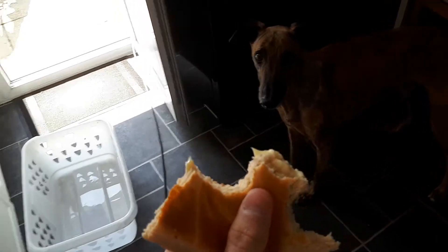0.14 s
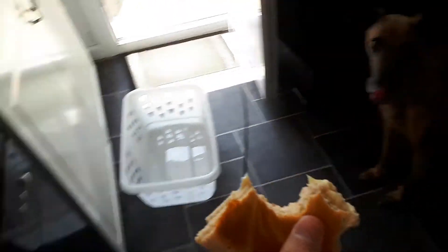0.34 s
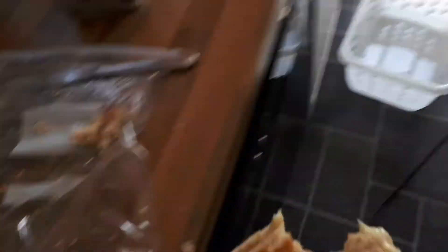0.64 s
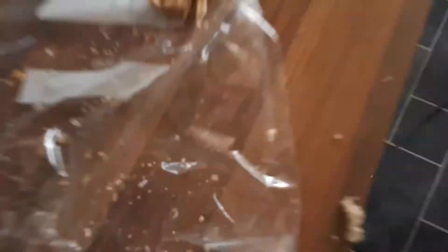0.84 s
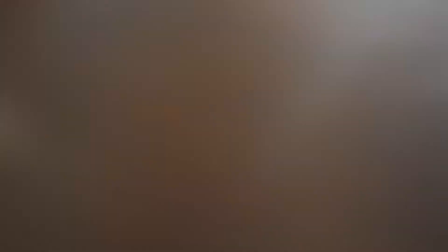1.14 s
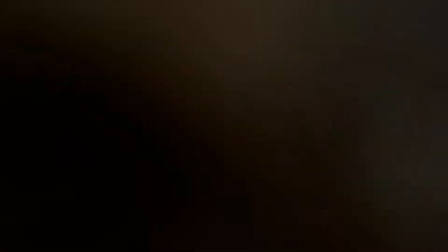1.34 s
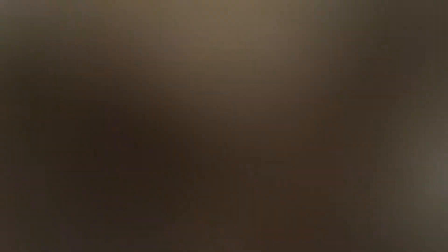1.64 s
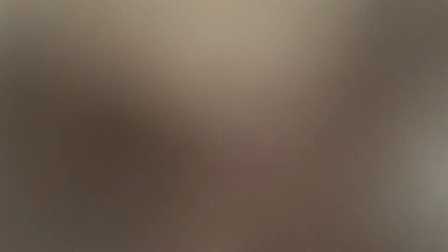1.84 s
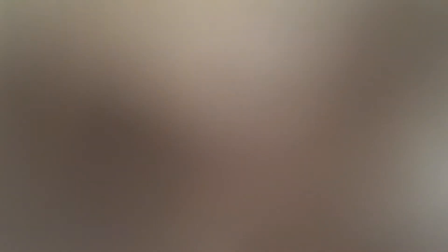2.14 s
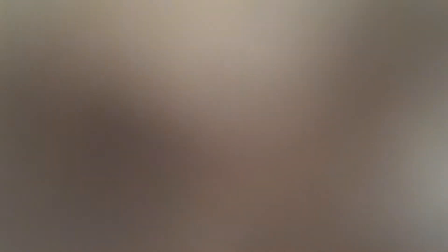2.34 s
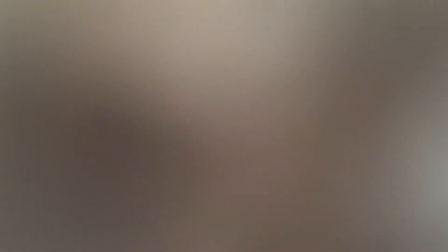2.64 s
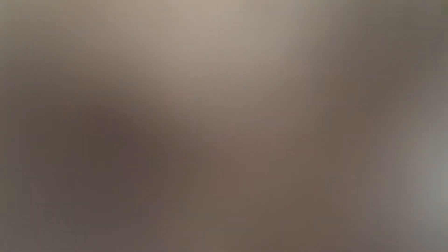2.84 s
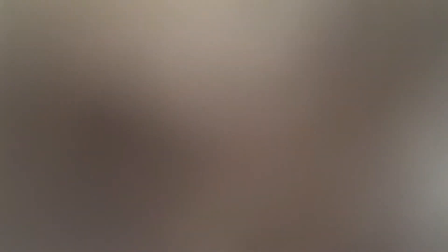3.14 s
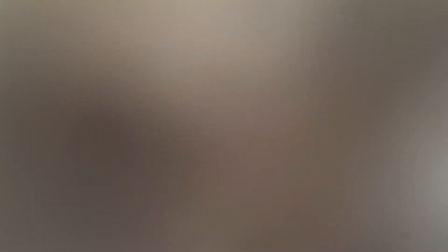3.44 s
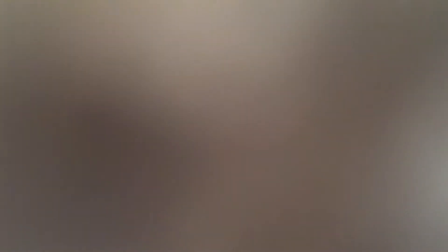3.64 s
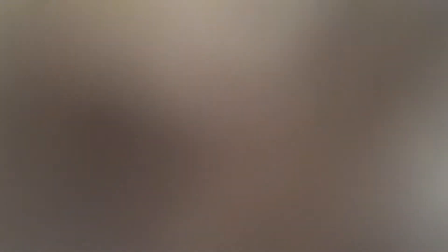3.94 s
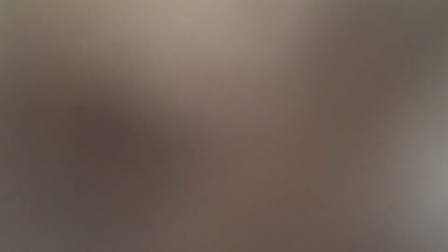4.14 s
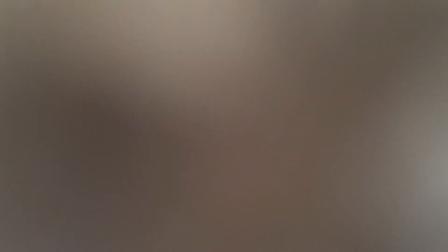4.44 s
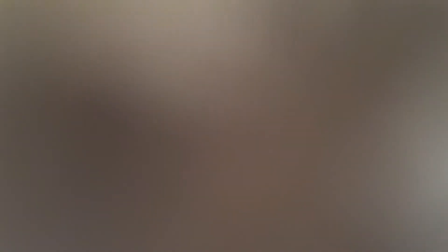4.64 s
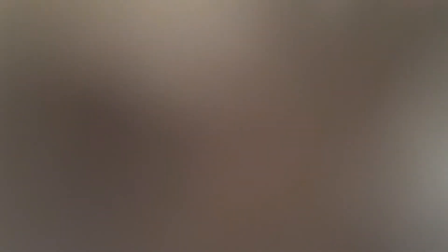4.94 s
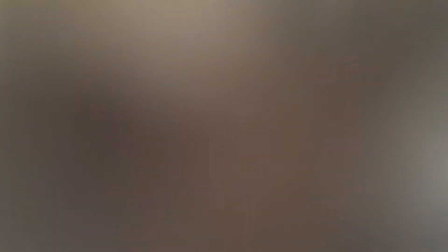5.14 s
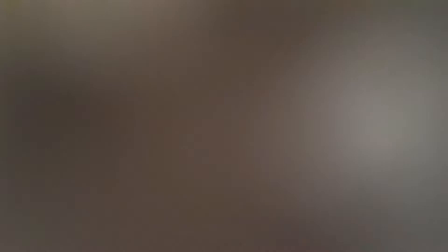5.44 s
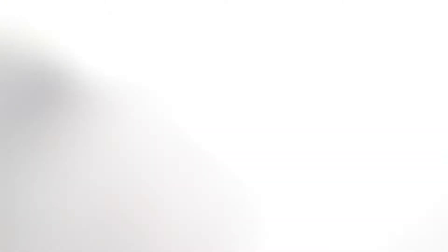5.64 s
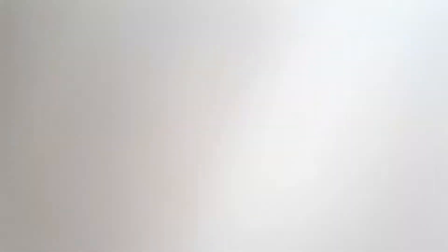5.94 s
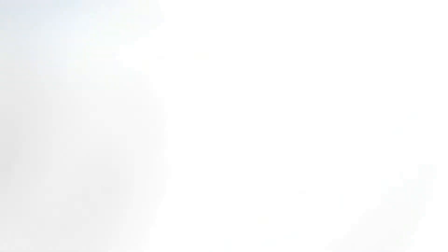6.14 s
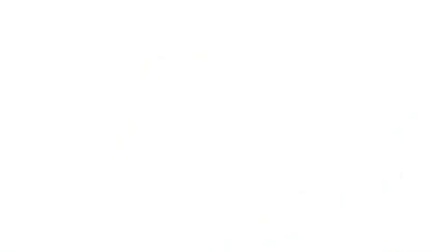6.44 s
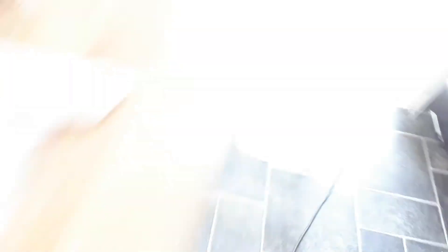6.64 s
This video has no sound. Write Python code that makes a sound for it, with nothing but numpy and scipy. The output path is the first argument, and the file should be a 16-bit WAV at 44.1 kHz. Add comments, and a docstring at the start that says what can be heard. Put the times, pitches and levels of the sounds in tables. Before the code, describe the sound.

Very close stereo handling noise in a calm kitchen. After a second of low hum, hiss and faint wavering whistle, plastic film and dry crust snap loudly against the phone with dull hollow knocks, leaning left. A couple of quiet seconds hold only little taps. Then comes a shorter, left-sided crunch and rumble, a pause with a breezy puff, and uneven crackling bumps before the hush.

```python
"""A quiet kitchen with an open door hums and hisses, with faint rustles, small taps and a thin whistle.
Then a phone is laid face down on a crumb-strewn plastic bread bag, shifted while a crusty roll is torn,
and picked up. Bag and crust crackle right at its two microphone ports; the case thuds and rumbles, mostly left.
Room, rustles and puffs are shaped noise, taps dying noise, the whistle a fluttering tone; snaps are short bursts,
thuds rung noise, and shoves drive random slips through case and crease resonances."""
import sys
import numpy as np
from scipy import signal
from scipy.fft import rfft, irfft, next_fast_len
from scipy.io import wavfile

SR = 44100
rng = np.random.default_rng(int(sys.argv[2]) if len(sys.argv) > 2 else 0)


def log_audio(samples):
    """Write samples as a 16-bit WAV file to the path given in sys.argv[1]."""
    # one column per channel
    frames = np.atleast_2d(samples).T
    # limit to full scale, then quantise
    limited = np.clip(frames, -1, 1)
    pcm = np.round(limited * 32767).astype(np.int16)
    wavfile.write(sys.argv[1], SR, pcm)


N = 298939
SILENT_DB = -120


def from_db(db):
    """Turns dB into an amplitude factor."""
    return 10 ** (np.asarray(db) / 20)


def rms_one(x):
    """Scales the whole signal, both ports together, to rms 1."""
    return x / np.sqrt(np.mean(x ** 2) + 1e-20)


def in_time(tables, level_columns):
    """Joins tables into curves over time; level columns fall silent outside each table."""
    rows = []
    for table in tables:
        first, last = np.array(table[0], float), np.array(table[-1], float)
        first[0] -= .01   # 10 ms fade at either end
        last[0] += .01
        first[level_columns] = last[level_columns] = SILENT_DB
        rows += [first, *table, last]
    seconds, *columns = np.transpose(rows)
    return [np.interp(np.arange(N) / SR, seconds, column) for column in columns]


def at_hz(points, hz):
    """Reads a spectrum in dB along log frequency, -80 dB beyond its ends."""
    point_hz, point_db = np.transpose(points)
    return np.interp(np.log(hz), np.log(point_hz), point_db, -80, -80)


def drift(rate_hz):
    """Slow random wander from twice-smoothed noise, one strand a port, spread 1."""
    step = 40   # samples between slow points
    r = np.exp(-2 * np.pi * rate_hz * step / SR)
    noise = rng.standard_normal((2, N // step + 2002))
    slow = signal.lfilter([1], [1, -2 * r, r * r], noise)[:, 2000:]   # skip the filter settling
    return np.array([np.interp(np.arange(N) / step, np.arange(len(s)), rms_one(s)) for s in slow])


def band(x, low_hz, high_hz):
    """Keeps one frequency band."""
    edges = [low_hz, min(high_hz, .45 * SR)]
    return signal.sosfilt(signal.butter(2, edges, "band", fs=SR, output="sos"), x)


def octave_band(x, hz, octaves):
    """Keeps a band centred on hz and so many octaves wide."""
    return band(x, hz * 2 ** (-octaves / 2), hz * 2 ** (octaves / 2))


def coloured(x, spectrum, right=((1, 0), (SR, 0))):
    """Shapes both ports by a spectrum, the right with an extra colour, each levelled to spread 1."""
    size = next_fast_len(N)
    hz = np.maximum(np.arange(size // 2 + 1) * SR / size, 1)
    gain = from_db(at_hz(spectrum, hz) + np.array([0 * hz, at_hz(right, hz)]))
    out = irfft(rfft(x, size) * gain, size)[:, :N]
    return out / out.std(axis=1, keepdims=True)


def dying_noise(count, t60):
    """Noise that falls 60 dB in t60 seconds, independent at each port."""
    return rng.standard_normal((2, count)) * from_db(-60 * np.arange(count) / SR / t60)


def at_ports(db, pan_db):
    """Splits a level by its left-minus-right dB: the port powers sum to 6 dB above it."""
    return db + 6 - 10 * np.log10(1 + 10 ** (np.array([-pan_db, pan_db]) / 10))


def add(out, start_s, sound, left_right_db):
    """Lays a short sound in, each port at its own peak level."""
    place = out[:, round(start_s * SR):][:, :sound.shape[1]]
    peaks = np.abs(sound).max(axis=1, keepdims=True)
    place += from_db(left_right_db)[:, None] * sound / peaks


# Room tone. Each row: time in seconds, hum level in dB before its slow wander, air level in dB.
ROOM_LEVELS = [(0, -71.5, -75), (.65, -66.5, -73), (1.7, -71.5, -77.5), (2.4, -71.5, -76.5),
               (3, -67, -73.5), (3.6, -70, -72.5), (5, -69.5, -74), (6.5, -68, -72.5), (6.78, -66.5, -76)]
# Spectra of low hum, room air and microphone hiss. Each row: frequency in Hz, relative level in dB.
HUM_SPECTRUM = [(12, -45.5), (20, -18.5), (38, -5.5), (59, -4.5), (76, -1), (162, 0.5), (203, -17),
                (245, -11), (400, -24.5), (520, -45), (880, -120)]
AIR_SPECTRUM = [(180, -27.5), (300, -2.5), (320, -15.5), (357, -8), (906, -6.5), (1160, -11.5), (2560, -17),
                (4000, -26), (5200, -57), (8800, -120)]
HISS_SPECTRUM = [(1470, -31), (2500, -3.5), (2710, -6), (4890, -6.5), (15000, -8), (16500, -21)]
# How far the two ports hear the same room. Each row: frequency in Hz, left-right correlation from -1 to 1.
PORT_LIKENESS = [(60, 0.62), (240, 0.67), (950, 0.08), (3770, -0.3), (15000, -0.03)]


def kitchen():
    """Hum and air reach both ports alike in the bass, over the microphones' own separate hiss."""
    hum_db, air_db = in_time([ROOM_LEVELS], [])
    mid, side = rfft(rng.standard_normal((2, N)))
    alike = np.interp(np.arange(len(mid)) * SR / N, *np.transpose(PORT_LIKENESS))
    shared, opposed = np.sqrt(1 + alike) * mid, np.sqrt(1 - alike) * side
    room = irfft(np.array([shared + opposed, shared - opposed]), N)
    hum = from_db(hum_db + 2 * drift(6)[0]) * coloured(room, HUM_SPECTRUM)
    air = from_db(air_db) * coloured(room, AIR_SPECTRUM)
    hiss = from_db(-78.5) * coloured(rng.standard_normal((2, N)), HISS_SPECTRUM)
    return hum + air + hiss


# Thin whistle from afar, a table per strand.
# Each row: time in seconds, pitch in Hz before its wobble, level in dB before its breathy flutter.
WHISTLE_STRANDS = [
    [(.4, 1900, -84), (.49, 2104, -76), (.57, 2141, -66.5), (.7, 2280, -81), (.81, 2580, -70),
     (.89, 2546, -71), (.94, 2130, -66), (1.0, 2200, -74), (1.07, 2545, -61), (1.12, 2620, -65)],
    [(2.05, 2076, -83.5), (2.25, 1868, -87)],
    [(2.34, 2520, -79), (2.41, 2540, -78)],
]


def whistle():
    """A tone follows the pitch, blurred into a narrow breathy strand by random flutter in size and phase."""
    hz, db = in_time(WHISTLE_STRANDS, [2])
    breathy = .5 + .5 * (drift(70) + 1j * drift(70))
    wobbling_hz = hz * (1 + 0.015 * drift(25)[0])
    tone = np.exp(2j * np.pi * np.cumsum(wobbling_hz) / SR)
    return from_db(db) * np.real(breathy * tone)


# Small taps away from the ports, the room ringing on. Each row: start in seconds, centre in Hz,
# width in octaves, peak midway between the ports in dB, left minus right in dB, 60 dB decay in seconds.
TAP_EVENTS = [(0.289, 2160, 0.15, -55.5, -9, 0.2), (.325, 2100, 0.42, -65, -15, 0.18),
              (.352, 775, .4, -54.5, 0, 0.42), (.478, 370, 0.63, -49.5, -1, 0.17),
              (0.479, 2080, 0.34, -57.5, -5, 0.071), (.465, 4960, 0.13, -66, 4, 0.26),
              (0.29, 1430, 0.26, -61, -4, 0.17), (.78, 8600, .8, -58.5, -4, 0.34),
              (0.742, 119, 0.79, -53.5, -9, 0.037), (0.818, 134, 0.79, -57.5, -13, 0.058),
              (1.721, 3140, 1.93, -53.5, 13, 0.034), (2.05, 6990, 1.5, -66, 5.5, 0.046),
              (2.584, 1490, 1, -61, 7, 0.064), (2.829, 2230, 0.33, -66, 0.5, 0.059),
              (3.295, 8150, 1.2, -52.5, 9, 0.018), (3.327, 7380, 1.06, -48.5, 20.5, 0.011),
              (3.581, 5000, 1.5, -62.5, 13, 0.017), (3.613, 2300, 0.3, -53, 2.5, 0.14),
              (3.643, 2190, 0.45, -57.5, 6, 0.16), (3.644, 7780, 0.39, -56, 9, 0.022),
              (3.705, 1400, 1.5, -57, 8, .08), (3.685, 170, 0.84, -59, -1, .08),
              (3.821, 1200, 5.1, -49, 18, 0.024), (4.926, 3400, 2.4, -52.5, -7, 0.02),
              (5.074, 950, 0.63, -59, 1.5, 0.039), (5.084, 2550, 0.37, -54.5, 5.5, 0.13),
              (5.091, 2950, 0.12, -63.5, 2.5, 0.34), (5.156, 2200, 0.27, -66.5, 6.5, 0.061)]


def taps():
    """A sharp start in one band, dying in the room."""
    out = np.zeros((2, N))
    for start_s, hz, octaves, db, pan_db, t60 in TAP_EVENTS:
        tap = octave_band(dying_noise(count=9000, t60=t60), hz, octaves)
        add(out, start_s, tap, [db + pan_db / 2, db - pan_db / 2])
    return out


# Air pushed over the ports. Each row: time in seconds, level in dB before the lumps swell and fade.
PUFF_LEVELS = [(4.53, -70.5), (4.558, -77), (4.68, -53), (4.92, -74)]


def puff():
    """Moving air makes lumpy low noise, mostly shared by the ports."""
    low_noise = band(band(rng.standard_normal((2, N)), 25, 280), 20, 320)
    lumps = low_noise * from_db(3.0 * drift(20))
    level_db, = in_time([PUFF_LEVELS], [1])
    return from_db(level_db) * rms_one(lumps[0] + 0.53 * lumps)


# Faint rustles while nothing presses on the ports. Each row: start in seconds, length in seconds,
# centre in Hz, width in octaves, level at the top of the swell in dB before flicker.
RUSTLE_EVENTS = [(0.261, 0.26, 9100, 4.3, -70.5), (0.643, 0.25, 7400, 0.48, -72),
                 (0.636, 0.21, 12100, 0.55, -78), (0.644, 0.26, 2070, 1.15, -70),
                 (0.44, 0.13, 8470, 0.51, -75.5), (1.071, 0.15, 10000, 1.2, -62),
                 (1.737, .1, 7720, 0.52, -80.5), (3.804, 0.14, 7800, .5, -73),
                 (3.269, 0.11, 6780, 0.97, -68.5), (3.27, 0.12, 2200, 1.3, -72.5),
                 (3.597, 0.15, 7500, .25, -74), (6.449, 0.25, 2000, 1.44, -72.5)]


def rustles():
    """Short swells of band noise, quick to start, with a flickering level."""
    out, flicker = np.zeros((2, N)), from_db(2.4 * drift(19)[0])
    for start_s, length_s, hz, octaves, db in RUSTLE_EVENTS:
        count = round(length_s * SR)
        swell = np.sin(np.pi * np.linspace(0, 1, count) ** 0.56)   # peaks before the middle
        noise = octave_band(rng.standard_normal((2, 12000))[:, :count], hz, octaves)
        out[:, round(start_s * SR):][:, :count] += from_db(db) * swell * rms_one(noise)
    return flicker * out


# Thuds on the case. Each row: start in seconds, level in dB shared out by at_ports,
# left minus right in dB, ring in Hz, 60 dB ring decay in seconds.
THUD_EVENTS = [(1.033, -42.5, -13, 302, 0.02), (1.12, -22.5, 26, 230, 0.038), (1.163, -12, 27, 178, 0.021),
               (1.211, -13.5, 18, 219, 0.02), (1.25, -8, 24, 372, 0.026), (1.293, -19, 14.5, 390, 0.017),
               (1.328, -30.5, 5.0, 480, 0.025), (1.391, -24.5, 23, 365, 0.025), (1.408, -21, 6, 336, 0.022),
               (1.434, -23, 12, 170, 0.036), (1.487, -34, -8, 298, 0.02), (1.575, -30.5, 37, 280, 0.025),
               (3.764, -23.5, 42, 420, 0.025), (3.966, -17, 28.0, 182, 0.025), (4.041, -19, 36, 404, 0.048),
               (4.064, -10.5, 39, 367, 0.018), (4.14, -27.5, 39, 336, 0.041), (4.19, -14.5, 36, 334, 0.039),
               (4.208, -13, 46, 436, 0.058), (4.288, -25, 41.0, 414, 0.059), (4.342, -29.5, 35, 570, 0.025),
               (4.375, -32, 34, 410, 0.035), (4.418, -39, 29.0, 360, 0.031), (4.486, -32.5, 39, 448, 0.031),
               (5.226, -31, 26, 441, 0.025), (5.348, -33, 17, 467, 0.025), (5.42, -26.5, 27, 475, 0.021),
               (5.439, -23, 32, 380, 0.017), (5.55, -14.5, 19, 307, 0.025), (5.591, -20, 26, 364, 0.01),
               (5.647, -11.5, 33, 456, 0.012), (5.723, -21, 31, 292, 0.015), (5.774, -36, 26, 463, 0.019),
               (5.832, -30, 34, 345, 0.022), (5.865, -27.5, 35, 367, 0.057), (5.924, -22, 27.5, 297, 0.036),
               (5.953, -14, 38, 377, 0.0083), (5.992, -33.5, -6, 340, 0.019), (6.008, -35, 16, 354, 0.0088),
               (6.065, -17.5, 32.0, 160, 0.0083), (6.111, -24.5, 18, 288, 0.043),
               (6.147, -26.5, 16, 223, 0.021), (6.188, -23.5, 20, 186, 0.031),
               (6.221, -20.5, 11, 290, 0.016)]


def thuds():
    """A short rough push rings the hollow between case and bag, a damped resonator."""
    out = np.zeros((2, N))
    for start_s, db, pan_db, hz, t60 in THUD_EVENTS:
        r, turn = from_db(-60 / (t60 * SR)), 2 * np.pi * hz / SR   # decay and angle per sample
        push = dying_noise(count=4000, t60=0.027)
        ring = signal.lfilter([1, -1], [1, -2 * r * np.cos(turn), r * r], push)
        add(out, start_s, band(ring, 90, 2300), at_ports(db, pan_db))
    return out


# Snaps of film and crust. Each row: start in seconds, level in dB shared out by at_ports, left minus right
# in dB, treble against body in dB, body centre in Hz, 60 dB decay of the burst's middle layer in seconds.
SNAP_EVENTS = [(1.0182, -34.5, -24, -4.5, 1970, 0.0046), (1.039, -42, -25, 7, 2280, 0.0075),
               (1.1222, -20.5, 3, -17, 1530, 0.0044), (1.153, -15, 16, -1, 2520, 0.012),
               (1.1681, -19, -3, -15, 1740, 0.006), (1.1866, -8, 13, -26, 1730, 0.007),
               (1.2176, -11, 13, -4.5, 1700, 0.002), (1.2357, -8.5, 16, -2, 2600, 0.0088),
               (1.2389, -15, 11.5, -5.5, 4460, 0.0081), (1.2497, -20, 5.0, -4, 1210, 0.006),
               (1.2512, -14.5, 6, -2, 1610, 0.01), (1.27, -4, 20, 3, 2840, 0.0086),
               (1.275, -11, 20, 11, 2900, 0.006), (1.298, -10.5, 9, 5, 1630, 0.0072),
               (1.3182, -20, -5.5, -4, 2820, 0.006), (1.3292, -15, -11, 8, 1560, 0.0084),
               (1.3478, -28, 4, -6, 2300, 0.006), (1.3942, -23, 18.5, -8, 1730, 0.011),
               (1.4092, -20.5, 6.5, -4.5, 1900, 0.006), (1.417, -19, -9, 0, 1630, 0.011),
               (1.4285, -7.5, -2, 5.5, 3850, 0.0057), (1.4333, -19, 3, 11, 1310, 0.0049),
               (1.4685, -31, -6, 3, 1820, 0.006), (1.487, -12, -16, 4, 1740, 0.012),
               (1.5038, -24.5, -1.5, 2.5, 1690, 0.0053), (1.5377, -47, -5.0, 7, 2310, 0.006),
               (1.5727, -29.5, 13, -0.5, 2930, 0.0045), (1.587, -43, 0, 0, 3020, 0.006),
               (3.7658, -20.5, 32.5, -7.5, 1300, 0.006), (3.9264, -29, 10.5, -9, 3520, 0.006),
               (3.938, -22.5, 25, -7, 2470, 0.0075), (3.9648, -17, 12.0, -6, 1490, 0.012),
               (4.0177, -28.5, 13.0, 3, 1200, 0.009), (4.0371, -26.5, 19, -5, 1280, 0.0056),
               (4.0654, -19, 18.5, -18, 1190, 0.012), (4.1642, -25, 20, -13, 2040, 0.006),
               (4.1742, -16.5, 27, -5, 1260, 0.0046), (4.185, -9.5, 22, 5, 1530, 0.0073),
               (4.1964, -14, 18, -7, 4240, 0.0053), (4.2084, -35, 15, 11, 1240, 0.006),
               (4.2366, -20.5, 25, -7, 1630, 0.006), (4.2732, -33, 12, -1, 1450, 0.006),
               (4.29, -32, 24, -18, 1730, 0.0068), (4.3114, -18.5, 27, -8, 1400, 0.0083),
               (4.3782, -41.5, 13, -18, 1350, 0.0072), (4.4148, -36, 18, -23, 2230, 0.006),
               (4.4694, -41, 26, 0, 1700, 0.0044), (4.4867, -41, 21.5, 1, 1250, 0.0065),
               (4.9288, -34.5, 7, -11, 4120, 0.006), (5.226, -26, 16.5, -3.5, 1200, 0.0066),
               (5.2426, -25, 18, 2.5, 1640, 0.0047), (5.2489, -37, 7, 7, 2550, 0.005),
               (5.309, -37, -18, 1, 3980, 0.0049), (5.3307, -18, 0.5, -23, 2700, 0.0086),
               (5.3489, -21.5, 4, -20, 1740, 0.0034), (5.3976, -30.5, 8, -2, 1590, 0.0067),
               (5.428, -20.5, 14, -10, 2900, 0.006), (5.445, -17, -12, -11, 2730, 0.0054),
               (5.461, -25.5, 3, -12, 3000, 0.011), (5.5074, -27, 7.5, -12, 2480, 0.01),
               (5.5164, -25.5, 4, -9, 1610, 0.0048), (5.5501, -15, 10.0, -2, 1550, 0.011),
               (5.5626, -25, 2, 3, 1780, 0.0086), (5.6064, -26, 13, 2, 3260, 0.0075),
               (5.6457, -17, 18.0, -16, 1200, 0.011), (5.681, -29, 5, -1, 2420, 0.0072),
               (5.7194, -26, 16, -1, 3130, 0.006), (5.729, -14.5, -6, 17, 1250, 0.0048),
               (5.7757, -25, 3, -9, 2670, 0.005), (5.7972, -29, 9.0, 3, 2980, 0.0055),
               (5.8336, -36.5, 22, 5, 1240, 0.011), (5.896, -26.5, 0.0, 1, 3920, 0.006),
               (5.904, -17, 13, -19, 3440, 0.006), (5.92, -25, 14, -13, 1350, 0.005),
               (5.9534, -15.5, 4.5, -2.5, 1160, 0.011), (5.9918, -21, -8, -6.5, 1950, 0.01),
               (6.0184, -29.5, 6, 10, 1640, 0.0054), (6.0657, -17.5, 15, -16, 1460, 0.0049),
               (6.0774, -27, 4, -13, 1420, 0.007), (6.1487, -25.5, 5, -9, 1920, 0.013),
               (6.1948, -23.5, 12, -12, 4400, 0.0094), (6.22, -25.5, -6, -6, 2220, 0.0086),
               (6.2263, -18, 31, -3, 1800, 0.006), (6.3281, -29.5, 10, -6, 4160, 0.0076)]


def snaps():
    """Each snap is a sharp front, a few ms of dying noise and a weak longer tail, in a body and a treble band."""
    out = np.zeros((2, N))
    for start_s, db, pan_db, treble_db, hz, t60 in SNAP_EVENTS:
        front = from_db(5.0) * dying_noise(count=1500, t60=.0015)
        middle = dying_noise(count=1500, t60=t60)
        tail = from_db(-22.5) * dying_noise(count=1500, t60=0.015)
        burst = front + middle + tail
        body = rms_one(band(burst, hz / 2.0, hz * 1.644))
        treble = from_db(treble_db) * rms_one(band(burst, 2700, 14000))
        add(out, start_s, body + treble, at_ports(db, pan_db))
    return out


def grains(per_s, spread_db, clump_db, clump_rate_hz, smooth):
    """Friction as random slips of uneven size, arriving in clumps, over a share of smooth noise."""
    sizes = from_db(spread_db * np.minimum(rng.exponential(1, (2, N)), 4)) * rng.choice([-1, 1], (2, N))
    slips = rms_one(sizes * (rng.random((2, N)) < per_s / SR))
    clumps = from_db(clump_db * drift(clump_rate_hz))
    smooth_noise = smooth * rng.standard_normal((2, N))
    return clumps * slips + np.sqrt(clumps) * smooth_noise   # the smooth part swells less


def creases(slips):
    """Each slip lands on a crease with its own pitch, which rings down 60 dB in nine cycles."""
    pitches_hz = np.geomspace(800, 14000, 12)
    # a fresh crease is dealt every 64 samples
    dealt = rng.integers(0, 12, (2, N // 64 + 1)).repeat(64, axis=1)[:, :N]
    out = .5 * slips
    for k, hz in enumerate(pitches_hz):
        r, turn = from_db(-60 * hz / (9.0 * SR)), 2 * np.pi * hz / SR
        struck = slips * (dealt == k) + 1e-18   # the tiny offset keeps the filter from slowing down
        ring = signal.lfilter([1 - r * r, 0, r * r - 1], [1, -2 * r * np.cos(turn), r * r], struck)
        out += ring * (14000 / hz) ** 0.19   # lower creases ring louder
    return out


# Shoves of the bag along the case. Each row: start in seconds, rise in seconds, hold in seconds,
# left crunch in dB, right crunch in dB, brightness as extra crinkle in dB, weight as extra rumble in dB.
SHOVE_EVENTS = [(1.02, 0.01, 0.0069, -73, -56, 2, 13.5), (1.113, 0.021, 0.1, -30, -39.5, 1, -1),
                (1.2, .02, .01, -31, -42, -9, -2), (1.228, 0.028, 0.034, -32, -30, -0.5, 1.5),
                (1.293, .03, 0.054, -37.5, -37.5, -6, -4.5), (1.38, 0.038, 0.0071, -34, -34, 3, -0.5),
                (1.461, .025, 0.018, -47, -49.5, 6, -10), (1.555, 0.016, 0.0089, -58.5, -58.5, 5, 4.5),
                (3.757, 0.0067, 0.06, -58, -79.5, -3.5, -1), (3.918, 0.015, 0.042, -29, -54.5, -4.5, -1),
                (3.939, 0.023, .01, -23.5, -39, 0, -2), (4.001, 0.054, 0.0084, -32, -42.5, 1.5, 0.5),
                (4.112, 0.077, 0.034, -27.5, -45.5, 0, 0.5), (4.258, 0.042, 0.014, -37, -58, 4.5, 1.5),
                (4.347, 0.024, 0.057, -56, -77, 0.5, 4), (4.45, 0.016, 0.0097, -59.5, -78.5, 14.5, 9.5),
                (4.923, 0.014, 0.017, -63, -70, 0, -8), (5.217, 0.013, 0.013, -48, -58.5, 8.5, 4.5),
                (5.322, 0.02, 0.0085, -47.5, -42, 4.5, -4), (5.353, 0.092, 0.0055, -40.5, -39.5, 5, 0),
                (5.445, 0.12, 0.027, -33.5, -44.5, 3, -0.5), (5.614, 0.038, 0.0062, -25, -51.5, 1.5, -5.5),
                (5.677, 0.058, 0.02, -38, -45.5, 3, 4), (5.811, .04, 0.026, -52.5, -63, 1, 4),
                (5.885, 0.014, 0.072, -34.5, -47.5, -1, -3), (5.957, 0.043, 0.044, -48, -45.5, 2, 3),
                (6.044, 0.028, 0.012, -30.5, -45.5, 1, -1.5),
                (6.117, 0.023, 0.0071, -40.5, -51.5, 6.5, -0.5), (6.163, 0.018, 0.048, -41, -47, 4.5, 0.5),
                (6.242, 0.014, 0.087, -53, -59, 10.5, -2)]


def shove_level(port_column, fall_db_per_s, lift_db):
    """Level in dB of the strongest shove at each moment: a 23.5 dB climb, a hold, a steady fall."""
    t, level = np.arange(0, N, 32) / SR, SILENT_DB
    for row, extra_db in zip(SHOVE_EVENTS, lift_db):
        start, rise, hold = row[:3]
        climb = np.minimum(23.5 * ((t - start) / rise - 1), 0)
        fall = -fall_db_per_s * (t - start - rise - hold)
        shove = row[port_column] + extra_db + np.minimum(climb, fall)
        level = np.maximum(level, np.where(t > start, shove, SILENT_DB))
    return np.interp(np.arange(N) / SR, t, level)


# Spectra of case rumble, crunch and crinkle. Each row: frequency in Hz, relative level in dB.
RUMBLE_SPECTRUM = [(15, -50.5), (25, -31), (120, -0.5), (195, 0), (250, -5.5), (400, 0), (520, -5),
                   (800, -14), (1300, -26.5), (3000, -54)]
CRUNCH_SPECTRUM = [(500, -24), (900, 0), (1200, -4.5), (1800, -7.5), (3500, -14.5), (5000, -21),
                   (9000, -58.5)]
CRINKLE_SPECTRUM = [(2000, -25), (3500, -7), (6000, -6.5), (8100, -2.5), (9500, -12.5), (11500, -7),
                    (15500, -10), (17000, -26.5)]
# The right port lies freer: less hollow ring, more bite.
# Each row: frequency in Hz, extra gain in dB before both ports are levelled.
RIGHT_COLOUR = [(20, 7), (100, 5.5), (400, -6.5), (900, -5), (2000, 10), (4000, 2.5), (5600, -2.5),
                (8000, -0.5), (17000, -4)]


def drag():
    """Film slips over the case: soft slips shake the case, hard ones crunch and crinkle at the ports."""
    brightness_db, weight_db = np.transpose(SHOVE_EVENTS)[5:]

    def port_levels(fall_db_per_s, lift_db):
        return np.array([shove_level(column, fall_db_per_s, lift_db) for column in (3, 4)])

    # fixed left and right offsets against the crunch; the case shakes on a little longer
    rumble_db = port_levels(300.5, weight_db) + np.array([[7.5], [-5.5]])
    crunch_db = port_levels(398, 0 * weight_db)
    crinkle_db = port_levels(398, brightness_db) + np.array([[-6], [-2.5]])
    soft = grains(per_s=900, spread_db=5.0, clump_db=2.4, clump_rate_hz=20, smooth=1.0)
    hard = creases(grains(per_s=1200, spread_db=2.4, clump_db=3.5, clump_rate_hz=60, smooth=0.88))
    rumble = from_db(rumble_db) * coloured(soft, RUMBLE_SPECTRUM, RIGHT_COLOUR)
    crunch = from_db(crunch_db) * coloured(hard, CRUNCH_SPECTRUM, RIGHT_COLOUR)
    crinkle = from_db(crinkle_db) * coloured(hard, CRINKLE_SPECTRUM, RIGHT_COLOUR)
    return rumble + crunch + crinkle


def scene():
    """Layers the sounds from the room up to the bag at the ports."""
    return kitchen() + whistle() + taps() + puff() + rustles() + thuds() + snaps() + drag()


def record(dry):
    """Peaks are rounded near full scale, then the top is cut steeply, 70 dB down from 16.6 kHz."""
    rounded = dry / (1 + dry ** 4) ** .25
    return signal.sosfilt(signal.cheby2(14, 70, 16600, fs=SR, output="sos"), rounded)


dry = scene()
out = record(dry)
log_audio(out)
```